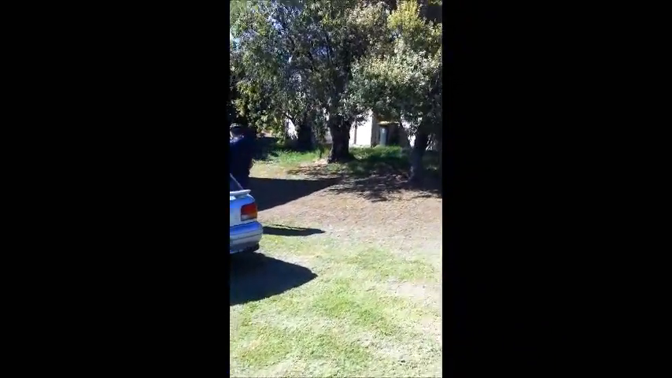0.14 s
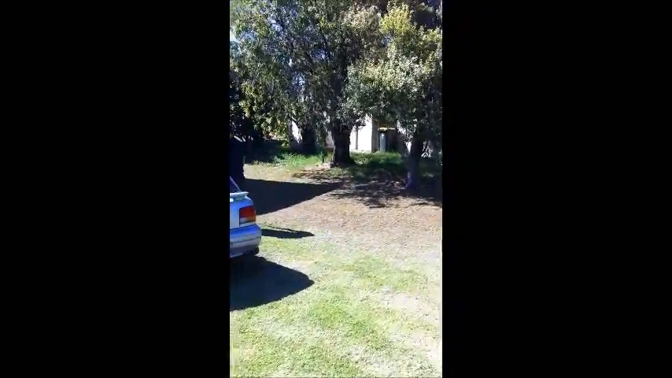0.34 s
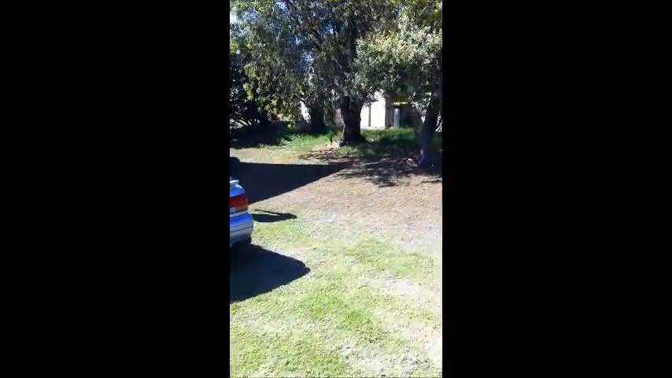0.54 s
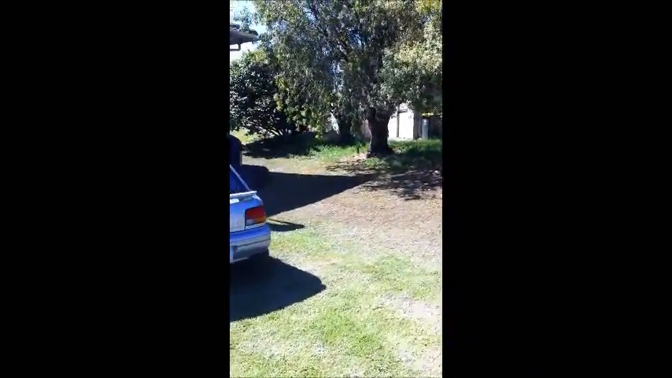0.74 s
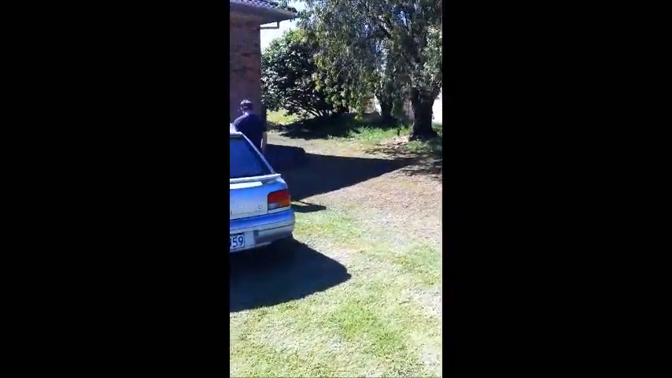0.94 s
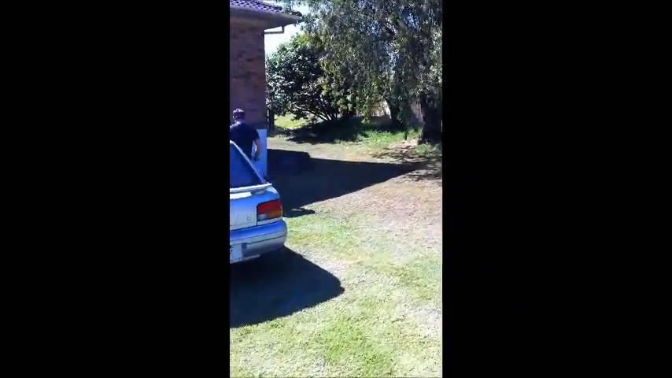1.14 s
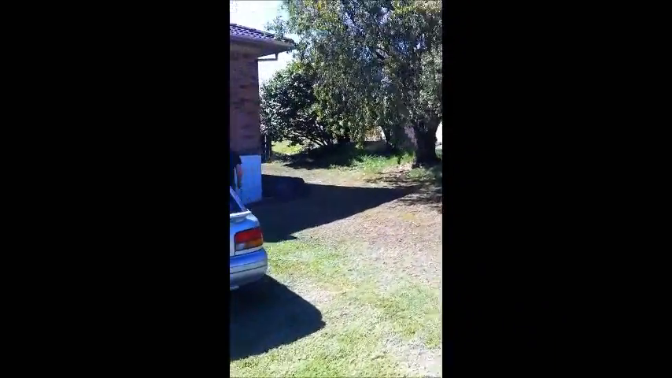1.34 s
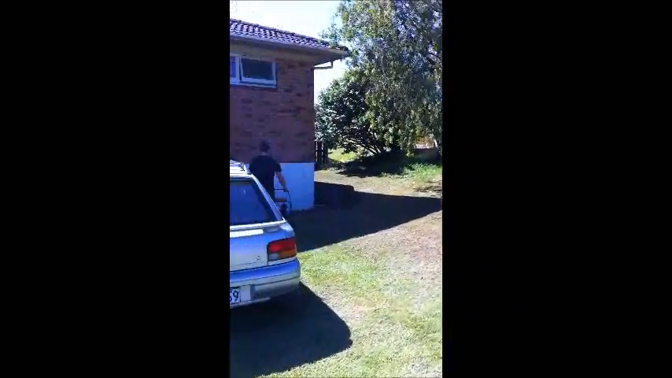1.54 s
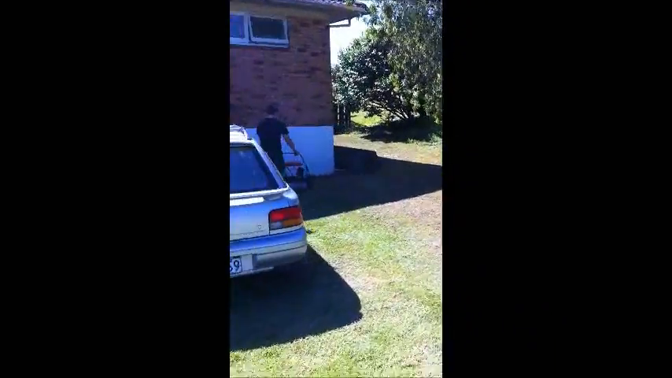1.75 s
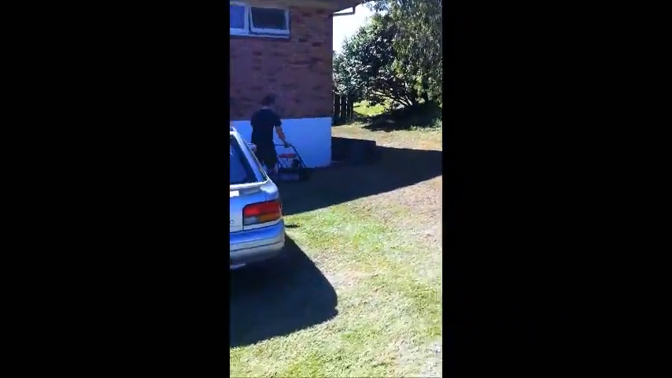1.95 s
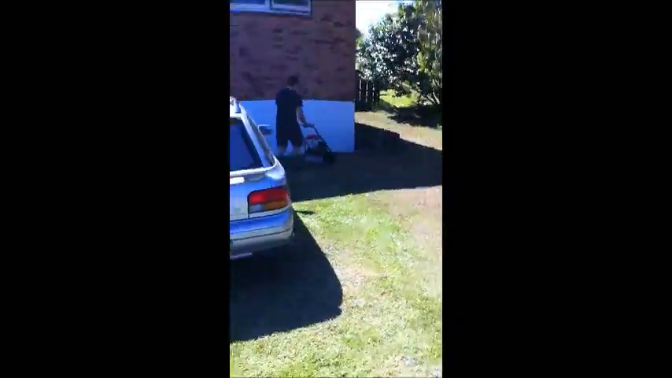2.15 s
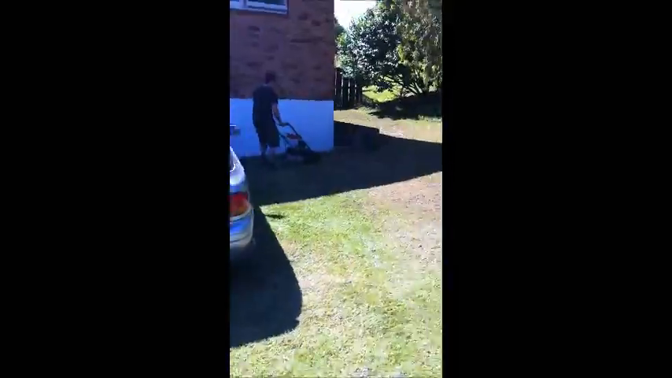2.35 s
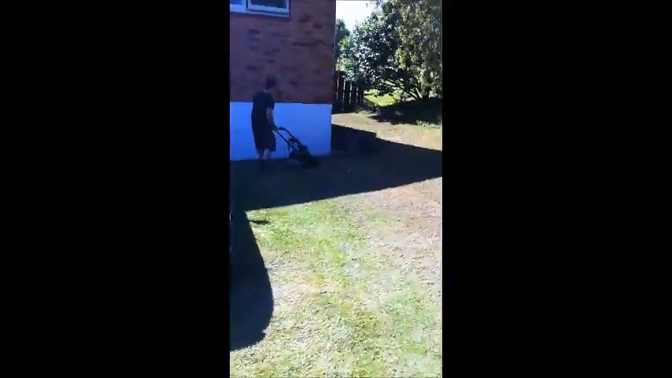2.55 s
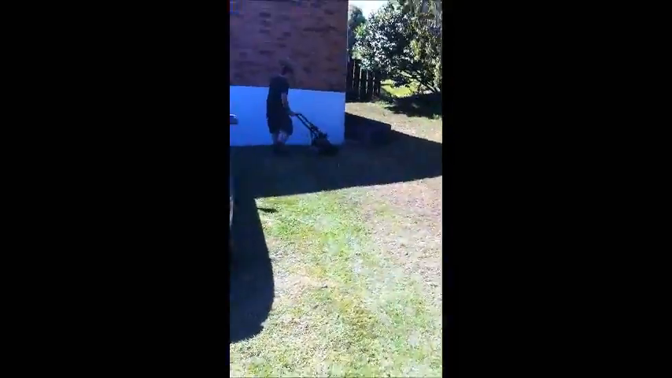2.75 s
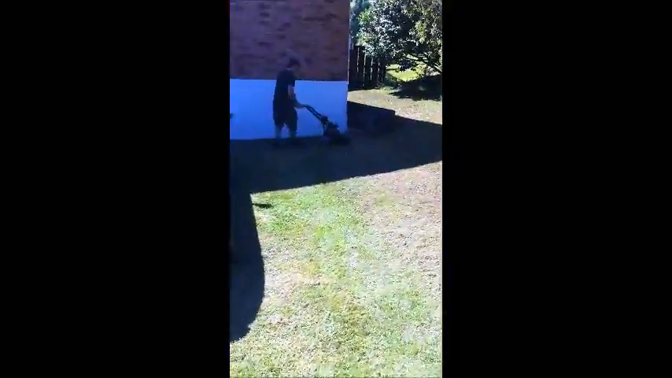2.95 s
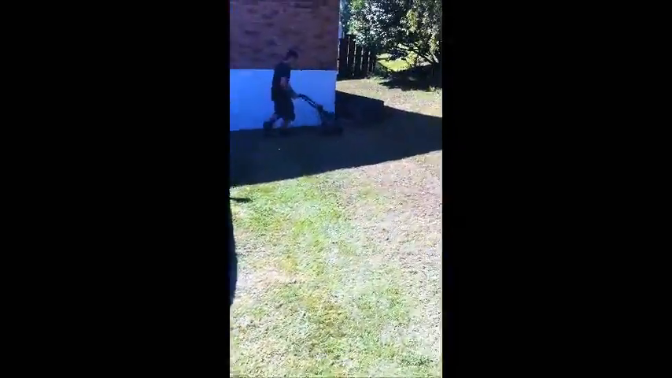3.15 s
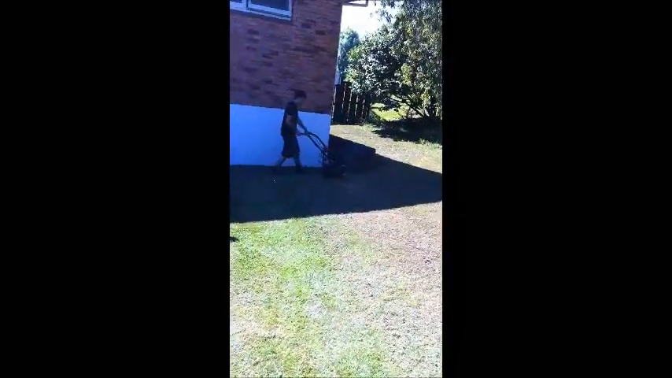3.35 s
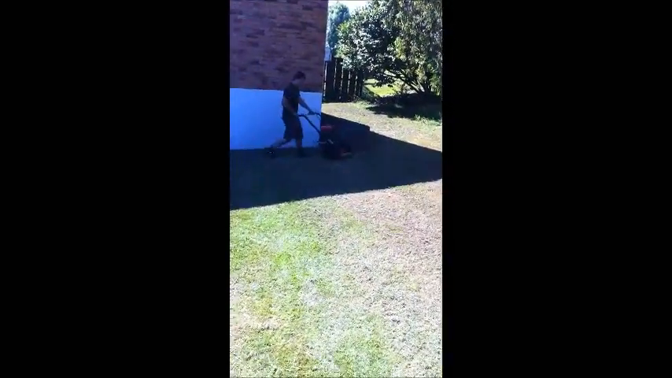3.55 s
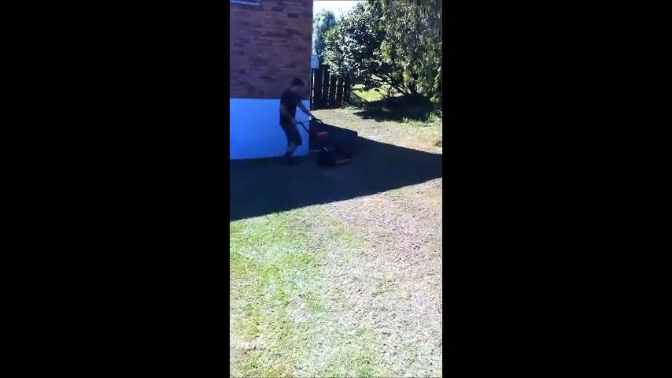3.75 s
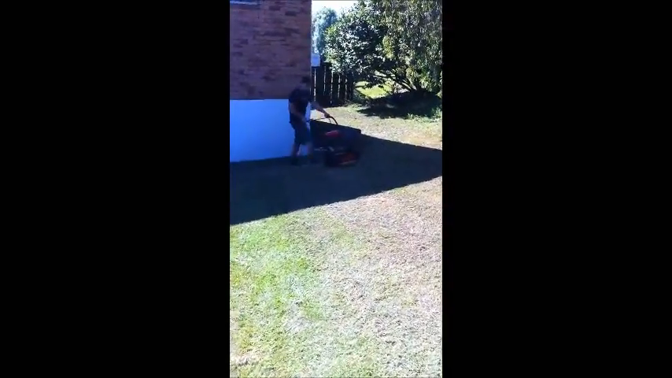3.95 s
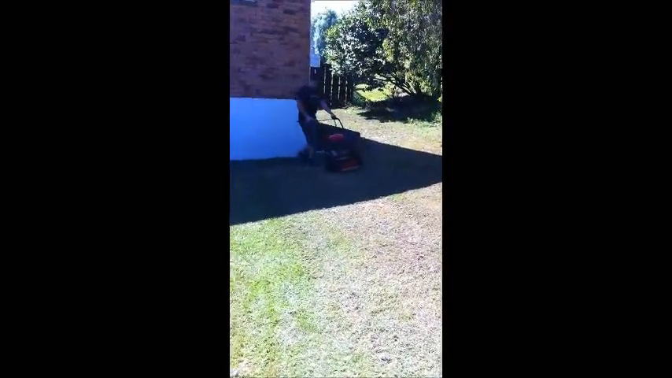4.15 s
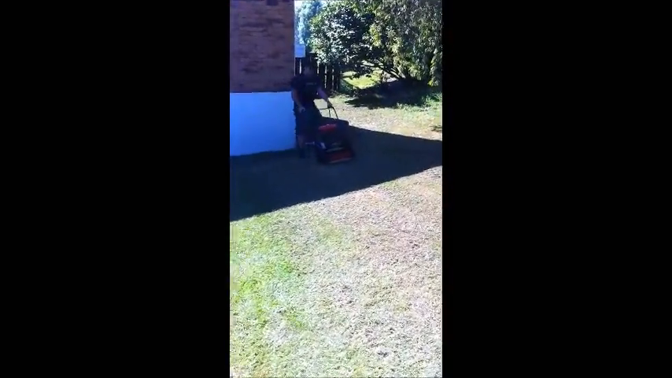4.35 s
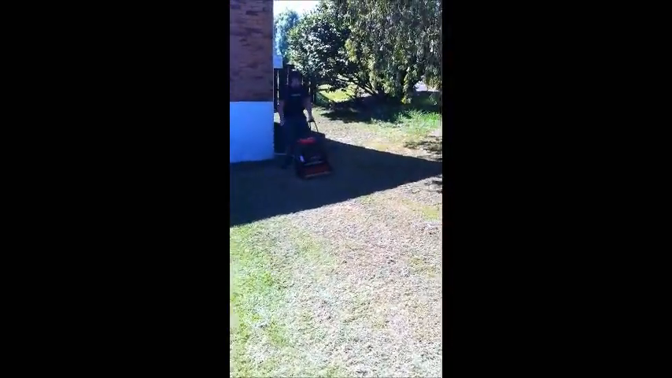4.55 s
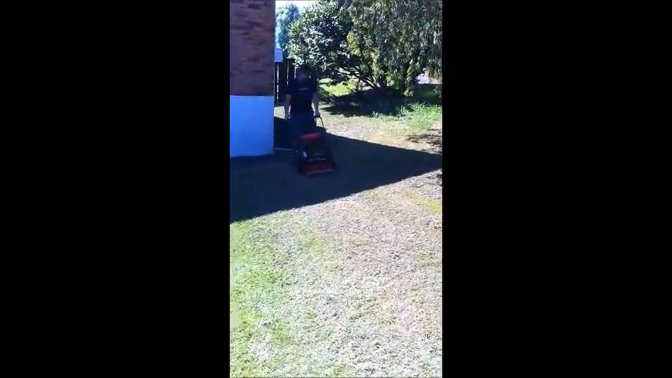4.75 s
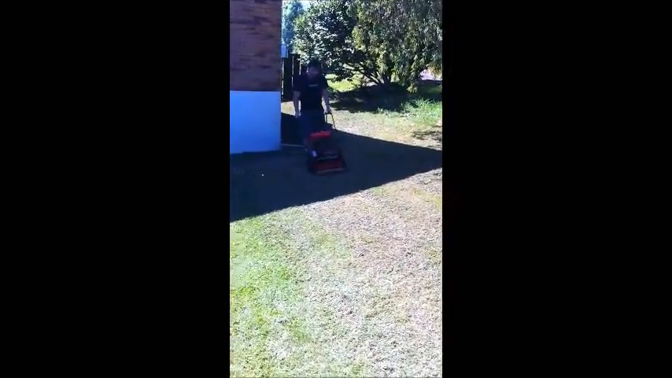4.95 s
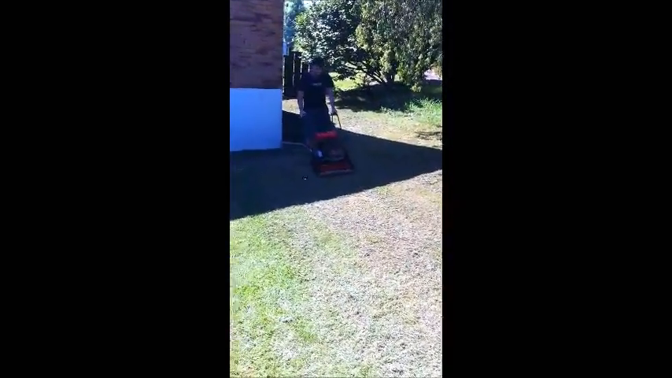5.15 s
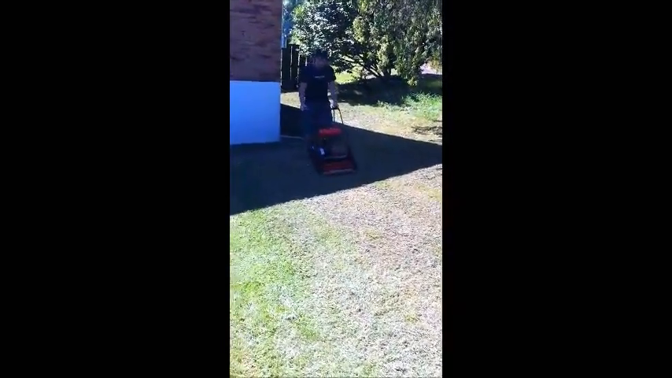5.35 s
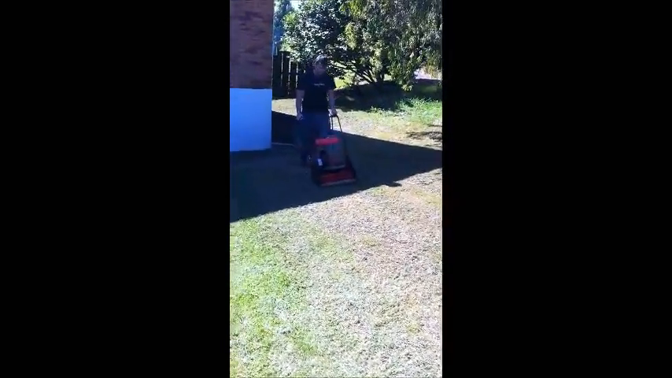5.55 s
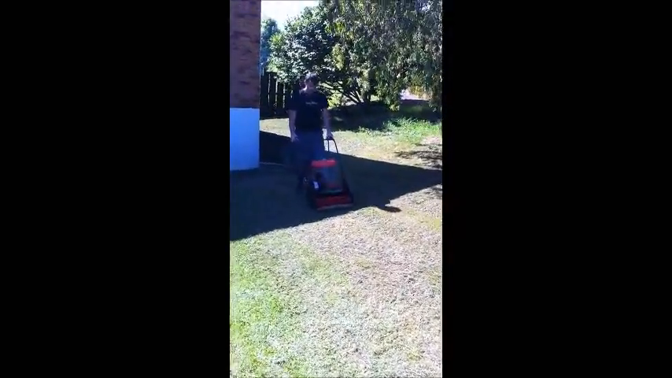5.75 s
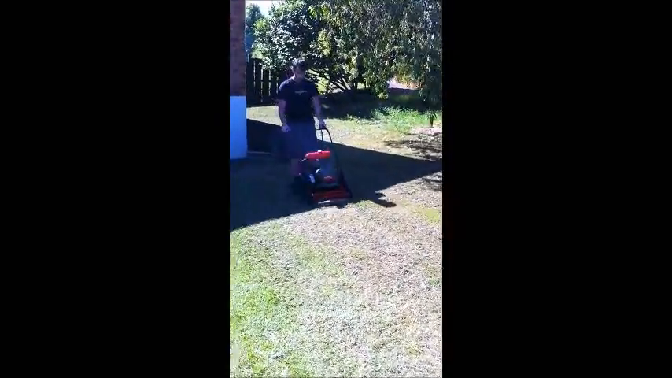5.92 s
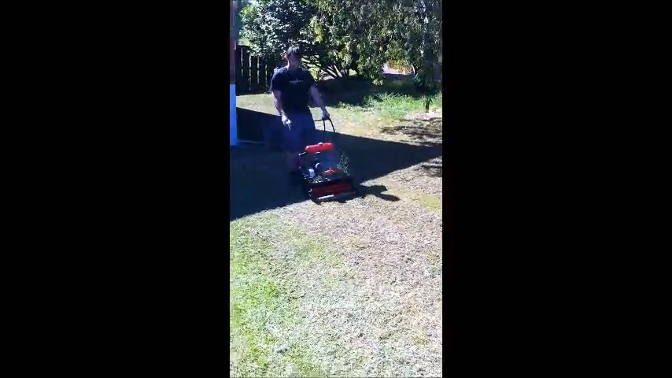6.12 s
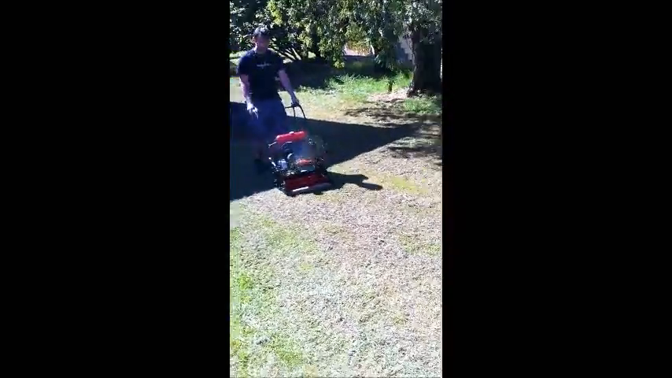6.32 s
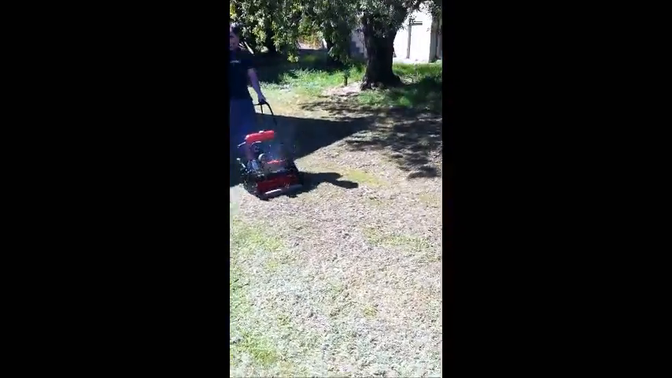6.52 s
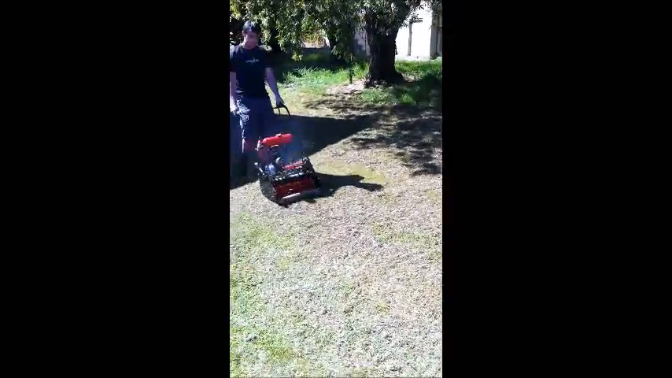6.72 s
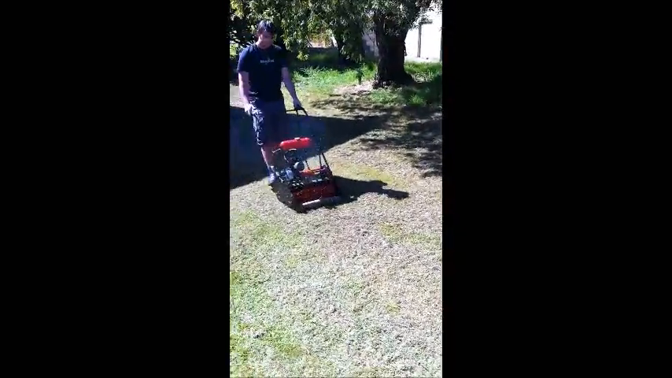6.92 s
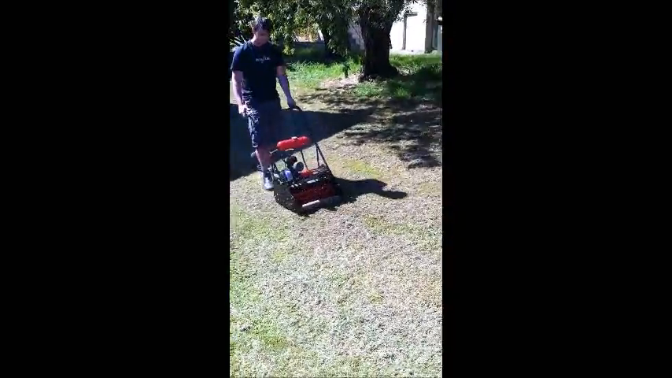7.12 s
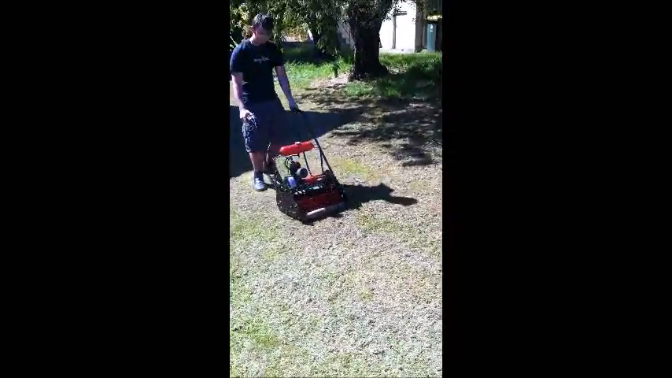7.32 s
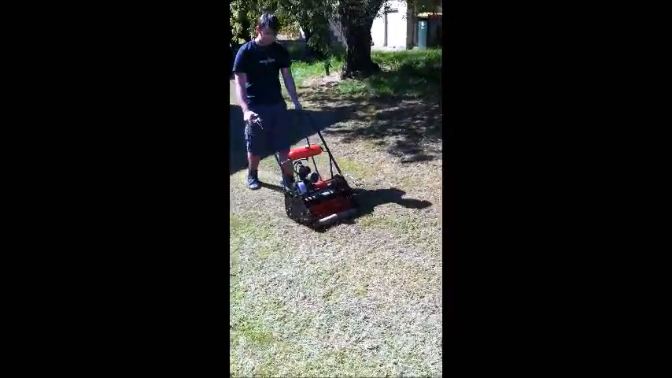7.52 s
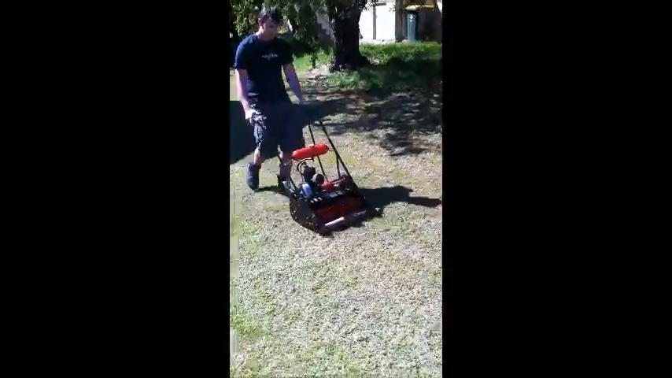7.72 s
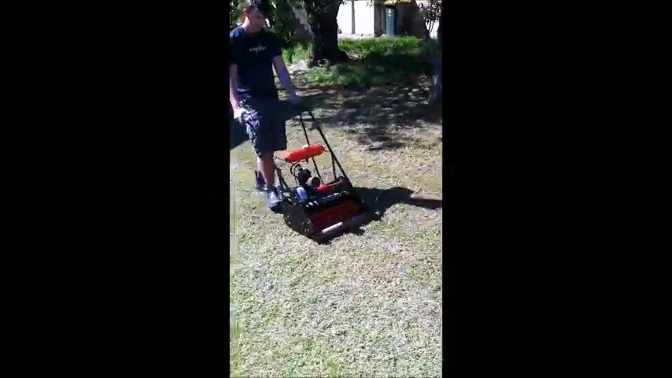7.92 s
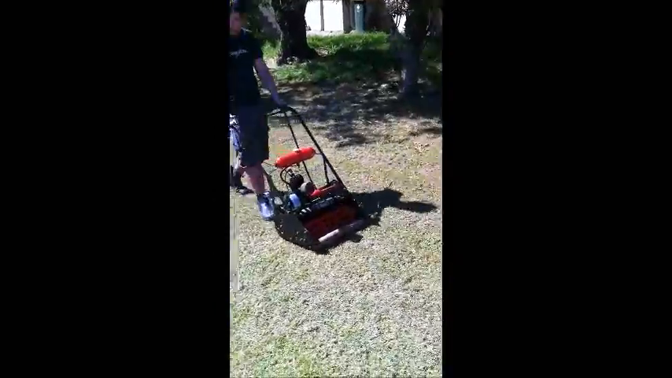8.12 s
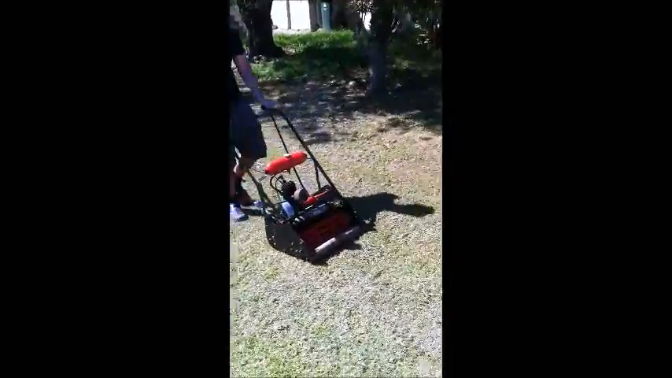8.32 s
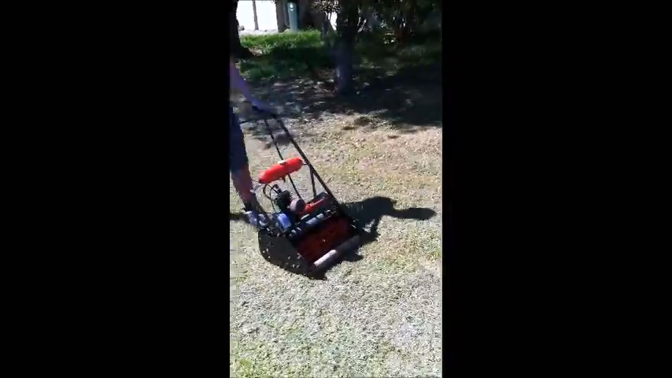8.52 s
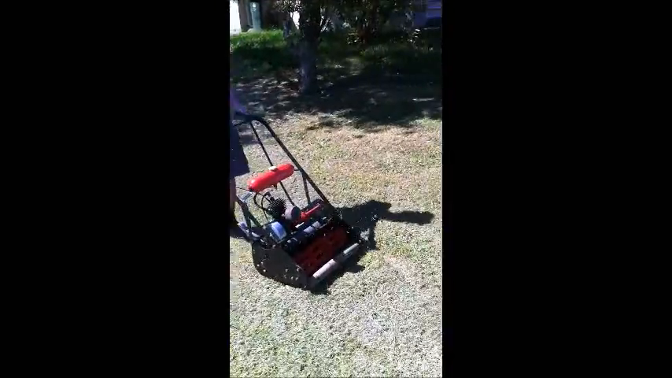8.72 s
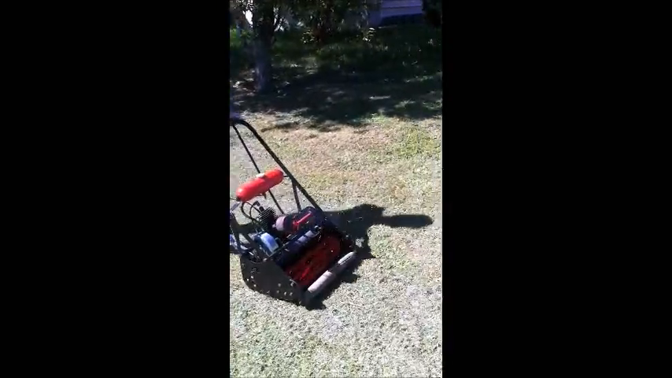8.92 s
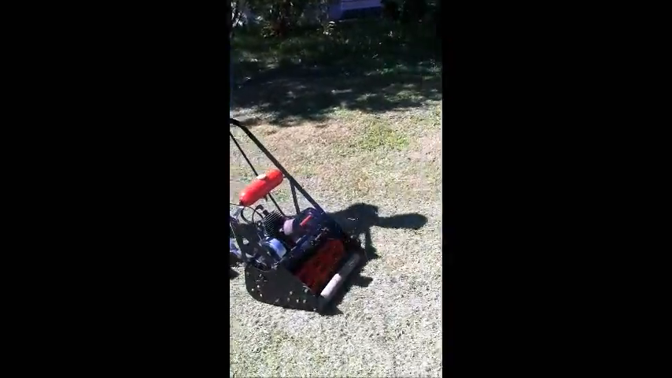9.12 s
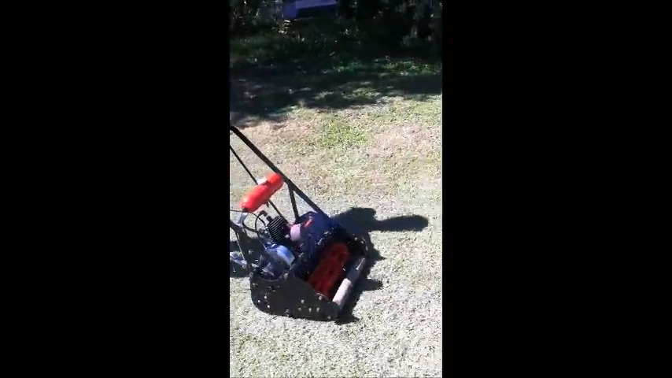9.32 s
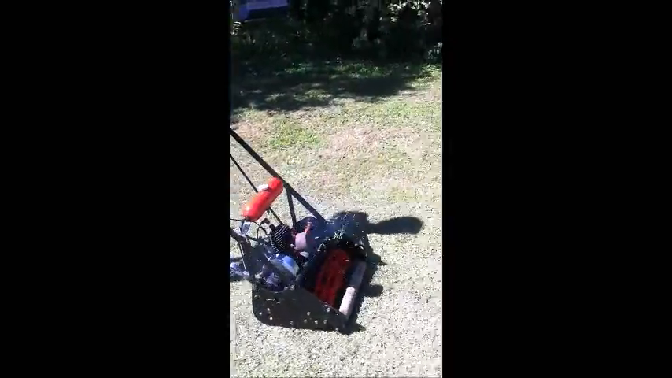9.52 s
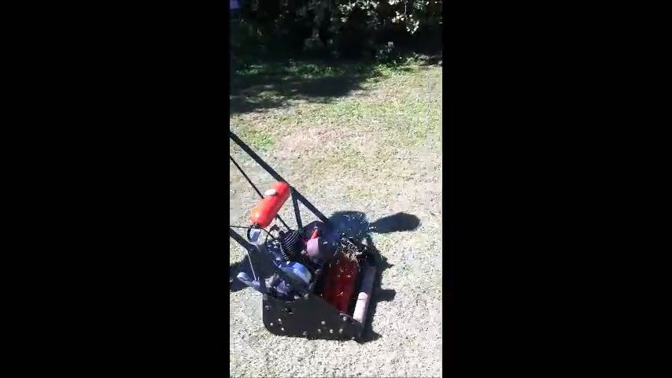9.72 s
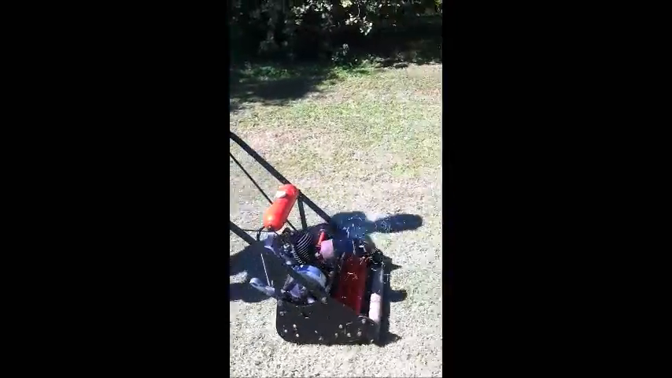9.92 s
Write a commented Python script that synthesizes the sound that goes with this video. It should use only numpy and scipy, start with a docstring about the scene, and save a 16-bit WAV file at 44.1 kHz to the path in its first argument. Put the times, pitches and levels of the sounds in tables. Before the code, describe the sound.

A small petrol reel mower rattles across a yard, chain and reel clattering metallically over a chugging engine, growing steadily louder and closer.

```python
"""House yard: a small four-stroke mower with a chain-driven cutting reel passes a wall, turns and rolls up
to the microphone. Pulses in pipe resonances make the exhaust thump; noise bursts make the valve tick.
Chain-tooth strikes excite the frame, panels, deck and reel; shaped noise is the hiss of cut grass.
Hum and drone follow the engine, a few low decaying knocks land close by, and a soft yard rumble lies under all.
"""
import sys
import numpy as np
from scipy import signal
from scipy.fft import rfft, irfft, next_fast_len
from scipy.io import wavfile
from scipy.ndimage import uniform_filter1d, minimum_filter1d, map_coordinates

SR = 44100
rng = np.random.default_rng(int(sys.argv[2]) if len(sys.argv) > 2 else 0)


def dump_mix(stems):
    """Bounce the given channels to the path in sys.argv[1] as a 16-bit WAV at rate SR."""
    frames = np.atleast_2d(stems).T  # one column per channel
    limited = np.clip(frames, -1, 1)  # hard clip at full scale
    pcm = np.round(limited * 32767).astype(np.int16)
    wavfile.write(sys.argv[1], SR, pcm)


N = 439677
T = np.arange(N) / SR

# Engine speed: t/s, firing rate f/Hz
ENGINE_SPEED = [(0.0, 16.507), (0.6, 16.436), (1.01, 15.278), (1.49, 15.084), (2.0, 15.75), (2.2, 16.4),
                (2.55, 16.3), (2.9, 15.7), (3.1, 15.3), (3.4, 15.9), (3.75, 15.95), (4.0, 15.6),
                (4.21, 15.3), (4.5, 15.881), (4.73, 15.116), (5.17, 15.845), (6.26, 13.755), (7.41, 13.719),
                (7.96, 15.635), (8.62, 15.325), (9.44, 15.724), (9.77, 14.874), (10.0, 15.138)]
# Path of the mower: t/s, rattle level/dB, clatter level/dB and grass level/dB (both against the rattle)
MOWER_PATH = [(0, -28, -11, -14), (.6, -23.5, -11.5, -12), (1.15, -28, -8, -15), (1.9, -26, -8.5, -11),
              (2.2, -21, -12.5, -15), (2.5, -20, -10.5, -11.5), (2.75, -20, -10.5, -8.5),
              (3, -22, -5.5, -13.5), (3.3, -22, -6, -10), (3.7, -21, -4.5, -10), (3.9, -19.5, -8, -8.5),
              (4.1, -19, -10.5, -10.5), (4.35, -17, -13, -15), (5.3, -18.5, -11.5, -13),
              (5.95, -16.5, -13.5, -14.5), (6.13, -15, -15.5, -16), (6.35, -16.5, -14, -16),
              (6.8, -15, -14, -14), (7.4, -15, -11.5, -14.5), (7.7, -12.5, -14, -14), (8, -14, -13, -14),
              (8.7, -14.5, -12.5, -13), (9.05, -12.5, -13, -13), (9.5, -15, -9, -9.5), (9.97, -15, -6, -10)]
FIRST_CYCLE = .93  # part of a cycle already run at time zero
TEETH = 20  # chain teeth engaged in one engine cycle


def mower():
    """One engine cycle clocks the exhaust, valve and chain; the chain shakes the metal and stirs the grass."""
    speed_hz = columns(ENGINE_SPEED)[0]
    cycle = FIRST_CYCLE + np.cumsum(speed_hz) / SR
    tooth_hz = TEETH * speed_hz
    rattle_db, clatter_db, grass_db = columns(MOWER_PATH)
    drive = chain(cycle, surge=.08, slack=.06, grit=1.86)
    metal = thin(frame_rattle(drive, tooth_hz) + reel_ring(drive, tooth_hz), hz=118)
    shaken = lash(cycle) * (metal + amp(clatter_db) * deck_clatter(drive))
    moving = amp(rattle_db) * (shaken + amp(grass_db) * cut_grass(drive))
    return moving + hum(cycle) + drone(cycle) + engine(cycle)


TURN_S = 3.0, 5.3  # the mower swings round until its exhaust faces the microphone
THUMP_DB, ECHO_DB = (-45.5, -36.5), (-56, -56)  # exhaust and its echoes: facing away, facing


def engine(cycle):
    """Exhaust and intake breathe half a cycle apart; the direct sound, its echoes and a valve tick add up."""
    thump_db, echo_db = np.interp(T, TURN_S, THUMP_DB), np.interp(T, TURN_S, ECHO_DB)
    breathing = exhaust_and_intake(cycle)
    return amp(thump_db) * breathing + amp(echo_db) * yard_echoes(breathing, t60=0.6) + valve_tick(cycle)


# Exhaust pipe modes: f/Hz, width/Hz, level/dB
PIPE_MODES = [(167, 58, 6), (243, 210, -1.5)]


def exhaust_and_intake(cycle):
    """Firing pulses ring the pipe with alternating mode signs; a weaker intake gulp rings half a cycle on."""
    firing = beats(cycle + .085, spread_db=1.5)
    gulp = beats(cycle + .585 + .015 * np.tanh(wander(hz=20)), spread_db=3.2)
    modes = [(-1) ** k * amp(db) * ringing(firing, hz, width) for k, (hz, width, db) in enumerate(PIPE_MODES)]
    breathing = evened(sum(modes)) + amp(-8.5 + 1.5 * wander(hz=1.1)) * ringing(gulp, 233, 42)
    return evened(thin(breathing, hz=107))  # a small pipe has no deep bass


# Valve tick spectrum: f/Hz, relative level/dB
TICK_SPECTRUM = [(400, -30), (700, 11), (1500, -20), (6000, -6), (9000, 6), (11500, 0), (12700, -2),
                 (13900, 5), (15200, -4), (17000, -22)]
# The valve cover comes into view: hidden, in view, at the end of the approach
VALVE_S, TICK_DB = (3.4, 4.2), (-58, -41, -33.5)


def valve_tick(cycle):
    """A dry noise burst of a millisecond or so, just behind each exhaust pulse."""
    tick_db = np.interp(T, (*VALVE_S, T[-1]), TICK_DB)
    snap = rng.standard_normal(300) * np.exp(-np.arange(300) / (0.0013 * SR))
    ticks = signal.oaconvolve(beats(cycle + .075, spread_db=3.4), snap)[:N]
    return amp(tick_db) * colour(ticks, TICK_SPECTRUM)


def yard_echoes(x, t60):
    """Wall and ground echoes: sparse decaying taps of random sign, the same for every beat, cut at 0.2 s."""
    t = np.arange(SR // 5) / SR
    signs = rng.choice([-1., 1.], len(t))
    present = rng.random(len(t)) < 600 / SR  # about 600 taps per second
    return evened(signal.oaconvolve(x, signs * present * amp(-60 * t / t60))[:N])


def chain(cycle, surge, slack, grit):
    """Teeth strike the chain a little off the beat, over the scrape of rollers and blades."""
    turned = TEETH * cycle + surge * np.sin(2 * np.pi * cycle)  # the crank speeds up on each power stroke
    teeth = beats(turned + slack * wander(hz=61.7), spread_db=3.2)
    jangle = rng.standard_normal(400) * np.exp(-np.arange(400) / (0.0013 * SR))  # each strike shakes a few links
    strikes = evened(signal.oaconvolve(teeth, jangle)[:N])
    return (strikes + grit * rng.standard_normal(N)) * amp(0.5 * wander(hz=18.0))


LASH_S, LASH_DB = (4.3, 9), (2, 3)  # the gap is deeper close by; its depth varies


def lash(cycle):
    """The slack of the chain hushes all it shakes for a moment before the power stroke."""
    gap = np.exp(6 * (np.cos(2 * np.pi * (cycle + .19 + .04 * wander(hz=15))) - 1))
    depth_db = np.interp(T, LASH_S, LASH_DB) * np.maximum(1 + 0.35 * wander(hz=15), 0)
    return amp(-depth_db * gap)


# Rattle spectrum: f/Hz, relative level/dB
RATTLE_SPECTRUM = [(530, -22), (900, -25.5), (1720, -1.5), (1910, 4), (2360, -1.5), (3120, 0), (4300, -0.5),
                   (4600, -5), (4910, -2), (5400, -6.5), (6420, -10), (9000, -19.5), (11700, -65),
                   (19800, -120)]


def frame_rattle(drive, tooth_hz):
    """Broad rattle of the steel frame, with its resonant modes and panels on top."""
    broad = bounced(rocked(colour(drive, RATTLE_SPECTRUM), patchy_db=2.08))
    return amp(-0.5) * broad + amp(-7.0) * panels(drive, tooth_hz)


# Close echo while the mower turns: from-to, growing delay in ms, strength halfway through
BOUNCE_S, BOUNCE_MS, BOUNCE_DB = (3.95, 4.65), (2.06, 2.16), -5


def bounced(x):
    """A close echo of opposite sign combs the rattle into even bands that slide down."""
    along = np.clip((T - BOUNCE_S[0]) / (BOUNCE_S[1] - BOUNCE_S[0]), 0, 1)
    share = amp(BOUNCE_DB) * np.sqrt(abs(np.sin(np.pi * along)))
    delay_s = np.interp(T, BOUNCE_S, BOUNCE_MS) / 1000
    late = map_coordinates(x, [(T - delay_s) * SR], order=3)
    return (x - share * late) / np.sqrt(1 + share ** 2)


# Frame modes that always ring: f/Hz, width/Hz, relative level/dB
FRAME_MODES = [(2170, 210, -18), (3230, 57, -27), (4963, 99, -24), (6360, 740, -13), (8220, 320, -26.5)]
# Panels that ring out while they face the microphone:
# f/Hz, width/Hz, spells of (start t/s, end t/s, relative level/dB)
PANEL_GLINTS = [(473.6, 27, [(3.9, 8.5, -23)]), (753, 65, [(0.94, 1.7, -8.5)]), (855, 165, [(1.2, 2.1, -10),
                (2.3, 4.3, -11.5)]), (590, 41, [(2.7, 4.1, -19)]), (1030, 250, [(3.3, 4.1, -11)]),
                (1480, 80, [(2.85, 3.45, -2.5)]), (1160, 23, [(2.8, 3.3, -8), (7.7, 9.2, -16)]),
                (1170, 280, [(7.66, 10, -12.5)]), (1440, 540, [(9.4, 10.2, -6.5)]),
                (1586, 20, [(1.8, 2.8, -18), (3.4, 3.9, -8), (6, 7.7, -11)]), (1894, 60, [(1.7, 2.75, -18),
                (2.9, 3.95, -5.5), (4.1, 5.6, -11), (5.95, 7.65, -3), (7.65, 9.2, -2), (9.2, 10.4, -1.5)]),
                (1982, 71, [(2.1, 2.72, -0.5), (9.35, 9.62, 5.5)]), (2080, 110, [(1.1, 2.2, -8),
                (5.3, 6.1, -8)]), (2150, 97, [(3.15, 4.3, -9), (4.4, 5.5, -4)]),
                (2280, 60, [(2.3, 2.7, -5)]), (2680, 45, [(2.9, 3.3, -7)]), (3470, 63, [(3.2, 3.45, 0),
                (3.75, 4.05, -3)]), (4820, 120, [(2.2, 2.65, -6)]), (2620, 61, [(2.2, 2.8, -8),
                (5.9, 6.3, -7), (6.3, 7.6, -9)]), (3004, 140, [(3.9, 4.55, -11), (7.6, 8, -9),
                (7.95, 8.7, -3.5)]), (3135, 69, [(1.9, 2.5, -9), (3.2, 3.9, -10), (4.5, 5.9, -32.5),
                (8.4, 9.55, -7)]), (3800, 1300, [(.35, .92, -0.5), (4.05, 4.55, -2)]),
                (3780, 120, [(6.7, 7.5, -28), (7.5, 8.5, -4)]), (4140, 73, [(5.9, 6.45, -10.5)]),
                (4266, 55, [(4.15, 4.5, -9), (4.5, 5.35, -6), (5.5, 5.95, -9)]),
                (4700, 300, [(7.4, 8.4, -8), (9.55, 10.3, -8)]), (4883, 240, [(0, .5, -1), (3.7, 4.1, -5),
                (6, 7.6, -10.5), (8.35, 9.4, 1), (9.4, 10.3, 2)]), (6500, 180, [(6, 13, -14.5)]),
                (6160, 210, [(8.7, 10.2, -10)]), (7140, 140, [(6.2, 13, -13)]),
                (8260, 180, [(9.1, 10, -12)]), (9000, 180, [(9.3, 10.2, -15)]),
                (9540, 140, [(9.3, 10.2, -21)])]
GLINT_FADE_S = 0.15  # a panel swings into and out of view
GLINT_HOLD = .6  # steady shaking keeps a panel ringing evenly (0-1)


def panels(drive, tooth_hz):
    """Steady modes drift as the mower rocks; the glints swell and fade."""
    out = np.zeros(N)
    for hz, width, db in FRAME_MODES:
        level = amp(db + 2.5 * wander(hz=2.5))
        out += level * ringing(drive, hz * (1 + .008 * wander(hz=.8)), width)
    for hz, width, spells in PANEL_GLINTS:
        bent_hz = pulled(hz, tooth_hz) * (1 + .005 * wander(hz=5))  # the panel flexes
        for start, end, db in spells:
            part = slice(max(round(start * SR), 0), min(round(end * SR), N))
            swell = np.clip(np.minimum(T[part] - start, end - T[part]) / GLINT_FADE_S, 0, 1)
            out[part] += amp(db) * swell * ringing(drive[part], bent_hz[part], width, GLINT_HOLD)
    return out


RING_HZ, RING_WIDTH_HZ, RING_DB = 1917, 25, -17  # level against the rattle


def reel_ring(drive, tooth_hz):
    """The reel rings in one narrow mode under the blows of the chain."""
    return amp(RING_DB) * ringing(drive, pulled(RING_HZ, tooth_hz), RING_WIDTH_HZ)


# Low clatter spectrum: f/Hz, relative level/dB
CLATTER_SPECTRUM = [(220, -15), (400, -9), (480, -4), (533, -2), (735, 0.5), (876, -2), (961, -2),
                    (1400, -4.5), (1820, -9), (3080, -120)]


def deck_clatter(drive):
    """The chain shakes a duller, lower clatter out of the deck."""
    return rocked(colour(drive, CLATTER_SPECTRUM), patchy_db=1.5)


# Grass hiss spectrum: f/Hz, relative level/dB
HISS_SPECTRUM = [(3820, -30), (6500, 1), (7790, -4.5), (10800, 0.5), (13600, -7.5), (15200, -9),
                 (16000, -24)]


def cut_grass(drive):
    """Grass thrown off the reel: bright noise of uneven strength with a little chain in it."""
    spray = rng.standard_normal(N) * amp(1.9 * wander(hz=40))
    return rocked(colour(0.35 * drive + spray, HISS_SPECTRUM), patchy_db=2.5)


# Hum of the chain: t/s, level/dB
CHAIN_HUM = [(0, -64), (1.6, -56), (2.3, -56.5), (3.5, -50), (5.4, -46), (6.2, -56), (7.4, -52), (8, -43),
             (9.4, -46), (9.97, -50)]


def hum(cycle):
    """A wavering tone, one swing for each chain tooth."""
    level = np.sqrt(2) * amp(columns(CHAIN_HUM)[0] + 2.5 * wander(hz=6))
    return level * np.sin(2 * np.pi * (TEETH * cycle + 0.05 * wander(hz=6)))


# Engine block overtones: swings in one cycle -> (level/dB facing away, level/dB facing)
BLOCK_DRONE = {8: (-51, -56), 10: (-48, -57), 12: (-52, -51), 16: (-53, -53)}


def drone(cycle):
    """Low overtones of the engine cycle hum from the block and waver in level and phase."""
    out = np.zeros(N)
    for swings, db in BLOCK_DRONE.items():
        level = amp(np.interp(T, TURN_S, db) + 2.5 * wander(hz=2))
        out += level * np.sin(2 * np.pi * (swings * cycle + .07 * wander(hz=4)))
    return np.sqrt(2) * out


# Low knocks: t/s, nominal level/dB, f/Hz, t60/s
LOW_KNOCKS = [(0.077, -26, 361, 0.073), (0.121, -25, 357, 0.095), (0.213, -22.5, 312, 0.054),
              (1.038, -17.5, 225, 0.036), (1.053, -19, 340, 0.025), (1.074, -16, 239, .045),
              (1.088, -15, 189, .06), (1.102, -16, 230, 0.036), (1.118, -19, 210, .045),
              (1.13, -16.5, 165, 0.046), (1.187, -21, 242, .025), (4.678, -2, 250, 0.014),
              (4.688, -7, 270, 0.018), (4.7035, -8, 380, 0.028), (4.714, -13, 190, 0.03),
              (4.74, -20, 180, .07)]
KNOCK_UPPER_DB = -10, -20  # the two higher rings


def knocks():
    """Short dull rings with a soft start and two weaker, higher rings."""
    out, t = np.zeros(N), np.arange(SR // 5) / SR
    for s, db, hz, t60 in LOW_KNOCKS:
        upper = amp(KNOCK_UPPER_DB) @ np.sin(2 * np.pi * np.outer([1.49, 2.26], hz * t))
        tones = np.sin(2 * np.pi * hz * t) + upper
        out[round(s * SR):][:len(t)] += amp(db - 60 * t / t60) * (1 - np.exp(-t / 0.0019)) * tones
    return thin(out, hz=98)


# Yard and engine block rumble spectrum: f/Hz, relative level/dB
RUMBLE_SPECTRUM = [(12, -55), (20, -30), (43, -31), (89, -9), (151, -2.5), (289, -12), (325, 2.5),
                   (405, -9), (450, 0), (580, -18), (990, -120)]
RUMBLE_DB = -47.5


def yard_rumble():
    """Low shaped noise whose level wavers."""
    return amp(RUMBLE_DB + 3.1 * wander(hz=17)) * colour(rng.standard_normal(N), RUMBLE_SPECTRUM)


def amp(db):
    """Decibels to amplitude."""
    return 10 ** (np.asarray(db) / 20)


def evened(x):
    """Scales x to rms 1."""
    return x / np.sqrt(np.mean(x ** 2) + 1e-20)


def columns(rows):
    """Every column of a curve table after its time column, sample by sample."""
    s, *values = np.transpose(rows)
    return [np.interp(T, s, v) for v in values]


def wander(hz):
    """Slow random drift of about rms 1, up to about hz, drawn at 400 points per second."""
    count = int(N / SR * 400) + 2
    slow = signal.lfilter([1], [1, -np.exp(-2 * np.pi * hz / 400)], rng.standard_normal(count))
    return np.interp(T, np.arange(count) / 400, evened(uniform_filter1d(slow, size=5)))


def colour(x, points):
    """Filters x by the spectrum curve, straight in dB over log frequency, to rms 1."""
    hz, db = np.transpose(points)
    size = next_fast_len(N)
    log_hz = np.log(np.fft.rfftfreq(size, 1 / SR) + 1)
    gain = amp(np.interp(log_hz, np.log(hz), db, left=-90, right=-90))
    return evened(irfft(rfft(x, size) * gain, size)[:N])


def beats(cycles, spread_db):
    """A click of uneven but bounded size at each whole number of cycles."""
    clicks = np.diff(np.floor(cycles), prepend=np.floor(cycles[0])) > 0
    return clicks * amp(2 * spread_db * np.tanh(wander(hz=59.7) / 2))


def ringing(drive, hz, width, hold=0):
    """A steep-sided mode of rms 1: shifts hz to zero, smooths twice, shifts back; hold (0-1) steadies it."""
    turn = np.exp(2j * np.pi * np.cumsum(hz * np.ones(len(drive))) / SR)
    r = np.exp(-np.pi * width * np.array([1, 2.43]) / SR)
    swing = signal.lfilter([1], np.poly(r), drive * turn.conj())
    level = uniform_filter1d(abs(swing), size=1300) + 1e-12
    return evened((turn * swing / level ** hold).real)


PULL = .9  # how far the nearest multiple of the tooth rate draws a ring towards itself (0-1)
PULL_HZ = 3600  # above this the tooth multiples smear and no longer draw


def pulled(hz, tooth_hz):
    """A ring leans towards the nearest multiple of the tooth rate."""
    return hz - PULL * (hz < PULL_HZ) * tooth_hz * np.sin(2 * np.pi * hz / tooth_hz) / (2 * np.pi)


def rocked(x, patchy_db):
    """Narrow patches of the spectrum rise and sink as the machine rocks over the ground."""
    z = signal.stft(x, nperseg=1024)[2]
    across = uniform_filter1d(rng.standard_normal(z.shape), size=3, axis=0)
    patches = uniform_filter1d(across, size=14, axis=1)
    return evened(signal.istft(z * amp(patchy_db * evened(patches)), nperseg=1024)[1][:N])


def thin(x, hz):
    """Takes out the bass below hz."""
    return signal.sosfilt(signal.butter(4, hz, "high", fs=SR, output="sos"), x)


def scene():
    """Mower, knocks and rumble, the same in both channels."""
    return np.tile(mower() + knocks() + yard_rumble(), (2, 1))


EDGE_HZ = 15900  # upper band limit


def record(dry):
    """One microphone: a quick limiter holds the peaks under full scale, then the band limit follows."""
    room_left = np.minimum(1, .95 / (abs(dry) + 1e-9))
    limited = dry * uniform_filter1d(minimum_filter1d(room_left, size=161), size=161)
    lowpass = signal.firwin(1023, EDGE_HZ, window=("kaiser", 9), fs=SR)
    return signal.oaconvolve(limited, lowpass[None], "same")


dry = scene()
out = record(dry)
dump_mix(out)
```